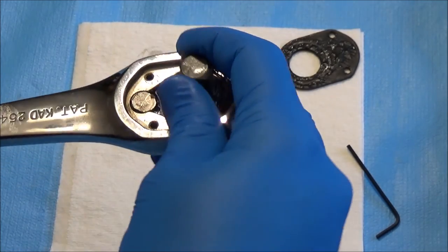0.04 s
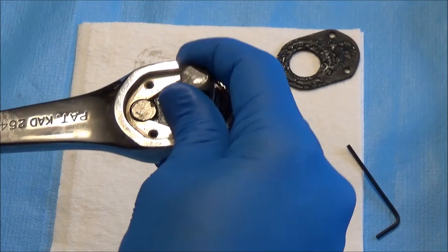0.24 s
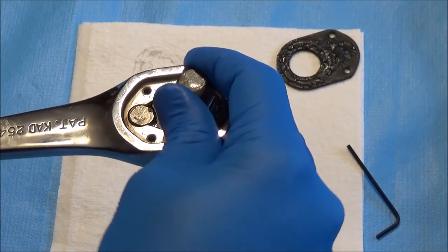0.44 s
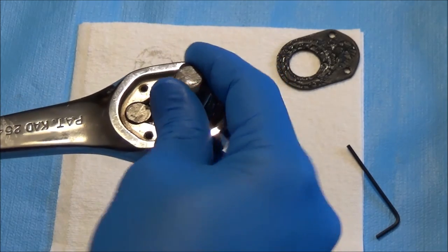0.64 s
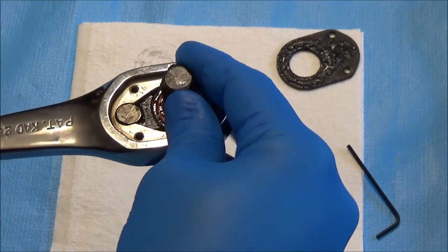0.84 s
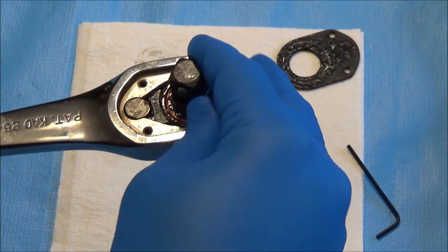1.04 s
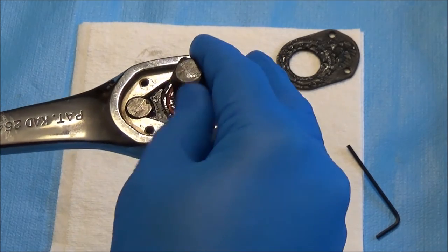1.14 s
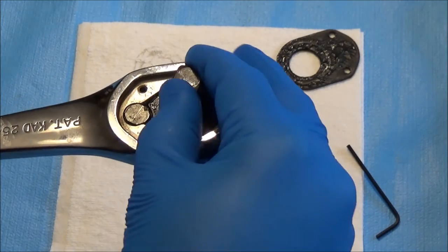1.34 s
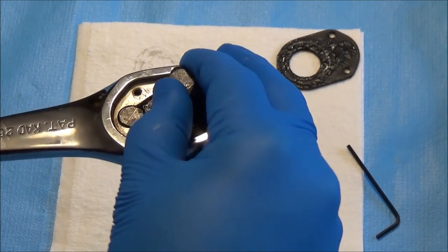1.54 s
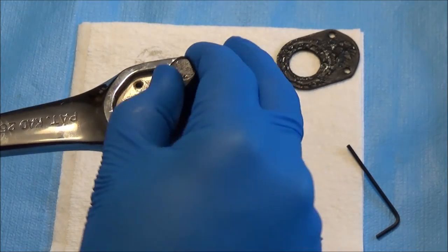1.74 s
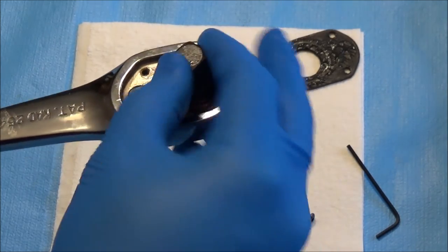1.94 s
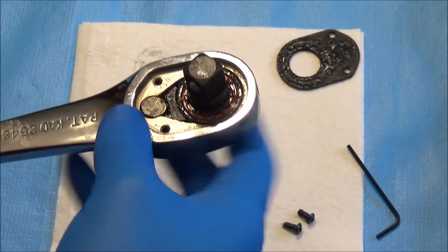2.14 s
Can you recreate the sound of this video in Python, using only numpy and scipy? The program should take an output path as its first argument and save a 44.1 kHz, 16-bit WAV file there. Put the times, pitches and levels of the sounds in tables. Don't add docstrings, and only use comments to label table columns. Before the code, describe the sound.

Steel ratchet clicking tooth by tooth as a hand turns it, pausing, then clicking again

```python
import sys
import numpy as np
from scipy import signal
from scipy.io import wavfile
from scipy.ndimage import uniform_filter1d

SR = 44100
rng = np.random.default_rng(int(sys.argv[2]) if len(sys.argv) > 2 else 0)


def unload_wav(signal):
    wavfile.write(
        sys.argv[1],
        SR,
        np.round(np.clip(np.atleast_2d(signal).T, -1, 1) * 32767).astype(np.int16),
    )


def gain_from_db(level_db):
    decades = np.asarray(level_db, float) / 20
    return 10 ** decades


N = 97020


def rms_one(x):
    return x / np.sqrt(np.mean(x ** 2) + 1e-20)


def in_time(rows):
    s, *columns = np.transpose(rows)
    return [np.interp(np.arange(N) / SR, s, c) for c in columns]


def at_hz(points, hz, axis=1):
    points = np.array(points)
    return np.interp(np.log(hz), np.log(points[:, 0]), points[:, axis])


def band(x, low_hz, high_hz):
    sos = signal.butter(2, [low_hz, min(high_hz, .45 * SR)], "band", fs=SR, output="sos")
    return signal.sosfilt(sos, x)


def top_cut(x, hz):
    return signal.sosfilt(signal.cheby2(12, 50, hz, fs=SR, output="sos"), x)


def clicks(s, gain):
    out = np.full(N + SR, 1e-18)
    np.add.at(out, (np.asarray(s) * SR).astype(int), gain)
    return out[:N]


def ring(x, hz, t60):
    r = gain_from_db(-60 / (t60 * SR))
    w = 2 * np.pi * hz / SR
    return signal.lfilter([.5, 0, -.5], [1, -2 * r * np.cos(w), r * r], x)


def dying(t60, size):
    return gain_from_db(-60 * np.arange(size) / SR / t60)


def air():
    # pitch in Hz, level in dB per Hz
    levels = [(50, -1.5), (90, -4), (165, -0.06), (900, -7), (1300, -6), (2100, -11), (3750, -13.5),
              (15000, -24)]
    # pitch in Hz, likeness of left and right (1 = the same)
    likeness = [(60, 0.92), (150, 0.9), (300, 0.68), (600, 0.17), (1600, 0.21), (4000, 0.49), (12000, 1)]
    level_db, top_hz = -63.5 + 2.35, 16250
    edges = 45 * 2 ** np.arange(0, 8.9, .5)
    white = rng.standard_normal((2, 2, N))
    out = 0
    for k, (low, high) in enumerate(zip(edges, edges[1:])):
        mid, side = band(white[k % 2], low, high)
        hz = np.sqrt(low * high)
        alike = np.clip(at_hz(likeness, hz), -1, 1)
        stereo = np.sqrt(1 + alike) * mid + np.sqrt(1 - alike) * side * [[1], [-1]]
        out = out + gain_from_db(at_hz(levels, hz)) * stereo
    return gain_from_db(level_db) * rms_one(top_cut(out, top_hz))


def motor():
    # time in seconds, pitch in Hz, level in dB
    pitch_and_level = [(0, 2630, -54.5), (.3, 2660, -52), (.65, 2720, -55), (1.1, 2700, -54),
                       (1.55, 2590, -53.5), (1.85, 2910, -61), (2.2, 2910, -56)]
    step_s, first_step_s, step_length_s = 1 / 29.97, .0198, .01
    push_db, push_s, t60_s, scatter_db = -10, .0025, .066, 1.5
    side_mode, side_db, side_t60_s = .075, -4, .02
    hz, db = in_time(pitch_and_level)
    step, age = np.divmod(np.arange(N) / SR - first_step_s + step_s, step_s)
    luck = rng.standard_normal((80, 2))[step.astype(int)]
    shape = np.where(age < push_s, gain_from_db(push_db), gain_from_db(-60 * (age - push_s) / t60_s))
    shape = shape * (age < step_length_s)
    shape = uniform_filter1d(shape * gain_from_db(db + scatter_db * luck[:, 0]), size=50)
    main = np.sin(2 * np.pi * hz * age)
    side_hz = hz * (1 + side_mode * (-1) ** step)
    side_gain = gain_from_db(side_db - 60 * age / side_t60_s / 2)
    side = side_gain * np.sin(2 * np.pi * side_hz * age + luck[:, 1])
    return shape * (main + side)


def far_machine():
    # time in seconds, drone in dB, its octave in dB, rumble in dB
    swells = [(0, -82, -87, -67), (.13, -78, -75, -72), (.34, -62, -73.5, -73), (.44, -73, -65.5, -73),
              (.6, -68.5, -77, -72.5), (.7, -70, -60.5, -63), (.8, -92, -77, -70), (1.0, -89, -80.5, -77),
              (1.3, -68, -82, -75), (1.4, -82.5, -89, -65), (1.75, -80.5, -74.5, -62.5),
              (1.97, -78, -81, -59), (2.07, -62, -67.5, -55.5), (2.16, -64, -68, -59.5),
              (2.2, -67, -73, -65)]
    drone_hz, rumble_hz, rumble_rough = 146.7, 32, .46
    thud_s, thud_db, thud_t60_s = .64, -49, .29
    drone_db, octave_db, rumble_db = in_time(swells)
    phase = 2 * np.pi * drone_hz * np.arange(N) / SR
    drone = 1.2 * (gain_from_db(drone_db) * np.sin(phase) + gain_from_db(octave_db) * np.sin(2 * phase))
    uneven = ring(rng.standard_normal(2 * N), rumble_hz, .21)[N:]
    rumble = np.sin(phase * rumble_hz / drone_hz) + rumble_rough * rms_one(uneven)
    puff = np.convolve(clicks([thud_s], 1), dying(thud_t60_s, size=9000))[:N] * rng.standard_normal(N)
    thud = band(puff, 218, 366)
    return drone + gain_from_db(rumble_db) * rms_one(rumble) + gain_from_db(thud_db) * thud / np.abs(thud).max()


def fingers():
    # time in seconds, peak in dB,
    # centre pitch in Hz
    small_ticks = [(.0825, -46, 8050), (0.0884, -46.5, 8800), (.1342, -49, 10300), (0.1769, -40, 10300),
                   (0.193, -43, 9500), (.1975, -45, 10500), (0.2038, -37.5, 7200), (.217, -35.5, 6600),
                   (0.2296, -43, 6600), (0.6202, -33, 10000), (.7393, -48.5, 5150), (0.9132, -40, 9000),
                   (1.055, -52, 3940), (1.4892, -46.5, 10100), (1.5083, -44.5, 9300), (1.528, -49, 10200),
                   (1.549, -30.5, 10200), (1.556, -22, 6900), (2.002, -54, 7400), (2.0365, -53, 10000),
                   (2.058, -48, 8000), (2.072, -41, 4500), (2.087, -52, 4500), (2.1183, -48, 4500),
                   (0.236, -45.5, 10000),
        (0.2738, -24, 7000),
        (0.3459, -26, 5500),
        (1.6872, -22, 7500),
    ]
    # time in seconds, level in dB
    rub = [(0, -72), (.22, -64.5), (.6, -66.5), (1.35, -78.5), (1.58, -73), (1.9, -62.5), (2.08, -60.5),
           (2.2, -69)]
    t60_s, octaves, extra_db, lag_s = .0045, .52, 1.5, .0007
    rub_per_s, rub_low_hz, rub_high_hz = 640, 2500, 12000
    ticks = small_ticks
    out = np.zeros(N + 800)
    noise = rng.standard_normal((len(ticks), 600))
    for (s, db, hz), grain in zip(ticks, noise):
        puff = grain * dying(t60_s, size=600)
        tick = band(puff, hz * 2 ** -octaves, min(hz * 2 ** octaves, 13500))
        tick = tick + .12 * band(puff, 2500, 13000)
        at = int((s + lag_s) * SR)
        out[at:at + len(tick)] += gain_from_db(db + extra_db) * tick / np.abs(tick).max()
    grains = (rng.random(N) < rub_per_s / SR) * rng.choice([-1, 1], N)
    grains = grains * gain_from_db(2.9 * np.minimum(rng.exponential(1, N), 4))
    rubbing = rms_one(band(grains, rub_low_hz, rub_high_hz))
    return out[:N] + gain_from_db(in_time(rub)[0]) * rubbing


def pawl():
    # time in seconds, peak in dB, brightness in dB per octave
    teeth = [(0.248, -7, 1.4), (0.2781, -8, -0.4), (0.3216, -7, -1.9), (0.3708, -7, -0.4),
             (0.4345, -6, 1.2), (0.4965, -7.5, -2.9), (1.6103, -6, 0.9), (1.665, -5, -0.7),
             (1.7196, -6, 0.9), (1.7715, -6.5, -1.4), (1.8191, -9, -1.2)]
    # pitch in Hz, first grip in dB, second grip in dB, t60 in seconds
    steel = [(820, -55.5, -50.5, 0.07), (2182, -21.5, -27, 0.032), (2801, -36.5, -41.5, .05),
             (4545, -9.5, -13, 0.027), (5527, -19.5, -20.5, 0.029), (6130, -10, -9, 0.0042),
             (7000, -7, -9.5, 0.013), (7210, -19, -35, .006), (8395, -10.5, -9.5, 0.0059),
             (9500, -10, -11.5, 0.0066), (10500, -19, -17, 0.0023), (12240, -36.5, -27, .0045),
             (13700, -28, -43, 0.0093), (16000, -48, -52, 0.0058)]
    # pitch in Hz, left minus right in dB
    pan = [(1000, 3), (2500, 0.7), (5000, 3.6), (10000, 0.7)]
    second_grip_s, scatter_db, land_s = 1.0, 1.35, .0003
    build_cycles = 2.6
    slip_lead_s, slip_db, slip_top_hz = .0012, -15, 6500
    bounce_s, bounce_db, bounce_low_hz = .001004, -2.5, 6400
    crack_db, crack_t60_s, crack_low_hz, knock_db = -8, .0076, 3560, -25
    s, db, tilt = np.transpose(teeth)
    s = s + land_s
    out = np.zeros((2, N))
    luck = rng.standard_normal((len(s), 2 * len(steel) + 1))
    bounce_after = bounce_s * (1 + .15 * luck[:, -1])
    for k, (hz, first_db, second_db, t60) in enumerate(steel):
        grip_db = np.where(s < second_grip_s, first_db, second_db)
        gain = gain_from_db(db + grip_db + tilt * np.log2(hz / 4545) + scatter_db * luck[:, k])
        at = s + build_cycles / hz
        bounce_gain = gain * gain_from_db(bounce_db + 3 * luck[:, k + len(steel)])
        rebound = clicks(at + bounce_after, bounce_gain / (1 + (bounce_low_hz / hz) ** 6))
        slip = clicks(s - slip_lead_s, gain * gain_from_db(slip_db) / (1 + (hz / slip_top_hz) ** 8))
        wave = ring(clicks(at, gain) + rebound + slip, hz, t60)
        wave = band(wave, hz / 1.656, hz * 1.81)
        out += (-1) ** k * wave * gain_from_db(at_hz(pan, hz) * np.array([[.5], [-.5]]))
    strikes = clicks(s + build_cycles / 9000, gain_from_db(db + crack_db))
    burst = np.convolve(strikes, dying(crack_t60_s, size=600))[:N] * rng.standard_normal(N)
    crack = band(band(burst, crack_low_hz, 12000), 1740, 12300)
    return out, crack + gain_from_db(knock_db) * band(burst, 500, 2200)


def shop(x):
    # pitch in Hz, t60 in seconds, level in dB
    reverb = [(1000, 0.27, -18.5), (2476, 0.43, -18), (4500, 0.35, -21), (6480, 0.454, -23),
              (9000, 0.28, -21.5), (12000, 0.23, -18.5), (14500, .14, -44.5)]
    # delay in seconds, level in dB
    echoes = [
        (.0028, -19.5),
        (0.0114, -21.5),
        (0.017, -29),
    ]
    start_s, width = .0034, .42
    size = SR // 2
    edges = 600 * 2 ** np.arange(0, 5.1, .5)
    white = rng.standard_normal((2, 2, size))
    tail = 0
    for k, (low, high) in enumerate(zip(edges, edges[1:])):
        hz = np.sqrt(low * high)
        fade = dying(at_hz(reverb, hz), size) * gain_from_db(at_hz(reverb, hz, axis=2) - 22.5)
        mid, side = band(white[k % 2], low, high) * fade
        tail = tail + mid + width * side * [[1], [-1]]
    tail = tail * np.clip(np.arange(size) / SR / start_s - 1, 0, 1)
    for s, db in echoes:
        tail[:, int(s * SR)] += gain_from_db(db)
    return signal.fftconvolve(x[None], tail, axes=1)[:, :N]


def scene():
    background = air() + motor() * gain_from_db([[-.7], [.7]]) + far_machine()
    touch = fingers()
    ring_of_steel, crack = pawl()
    send = gain_from_db(-2) * ring_of_steel.mean(axis=0) + gain_from_db(5.5) * crack + touch
    return ring_of_steel + crack + touch + shop(send) + background


def roll_off(x):
    return signal.sosfilt(signal.butter(12, 17140, fs=SR, output="sos"), x)


def record(dry):
    return roll_off(top_cut(dry, 17100))


dry = scene()
out = record(dry)
unload_wav(out)
```